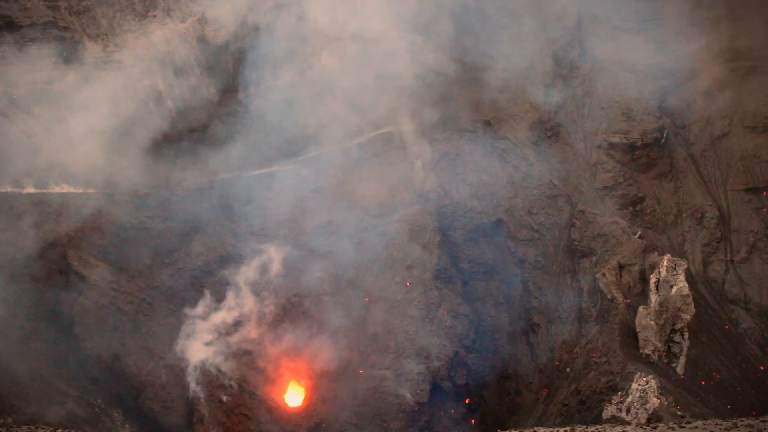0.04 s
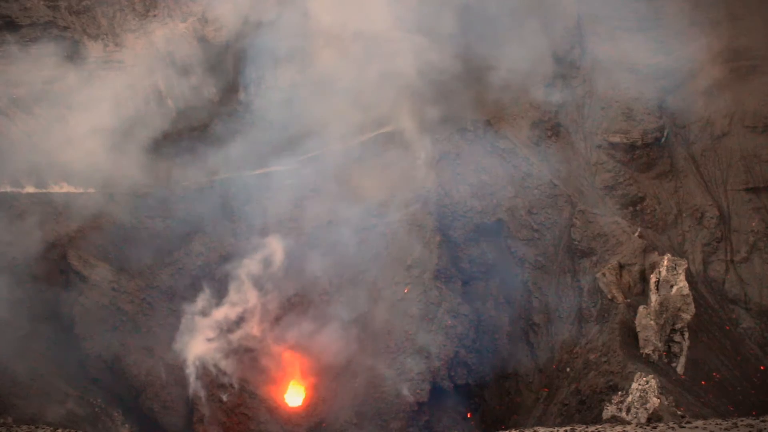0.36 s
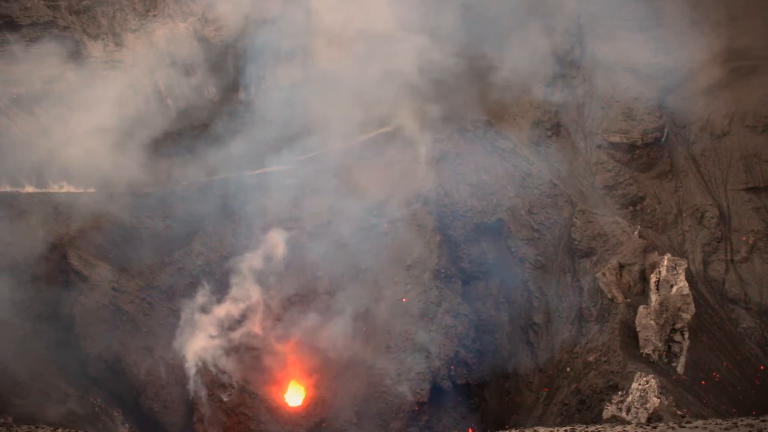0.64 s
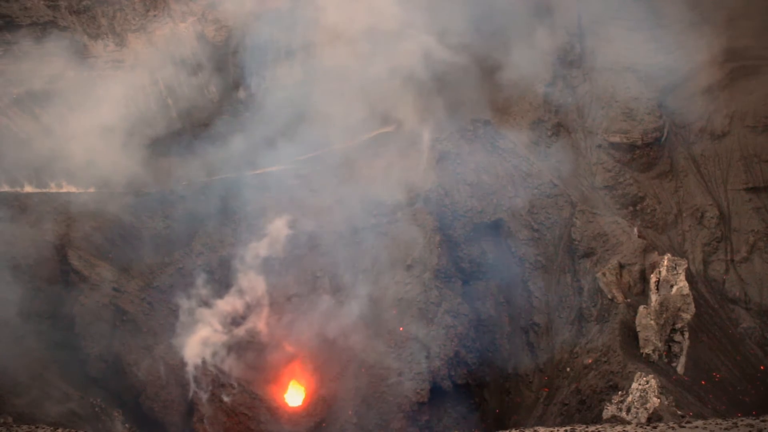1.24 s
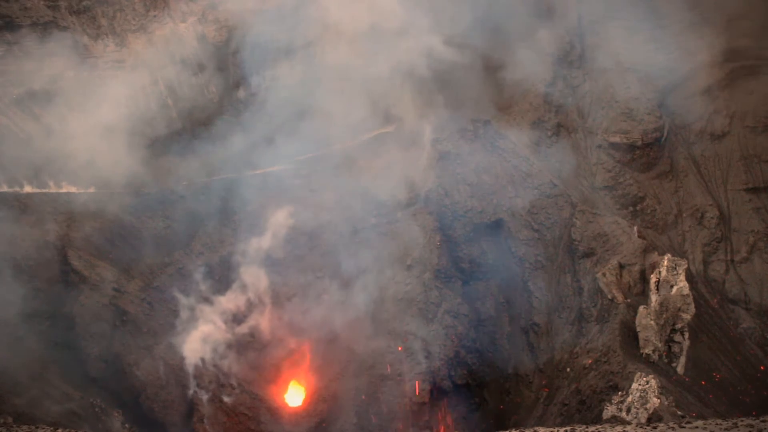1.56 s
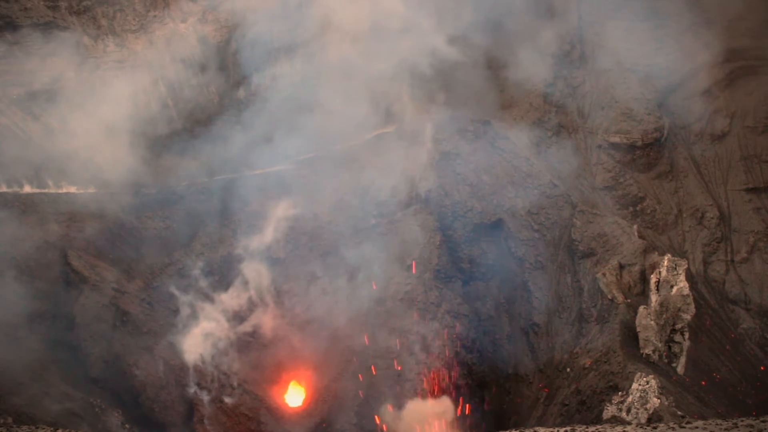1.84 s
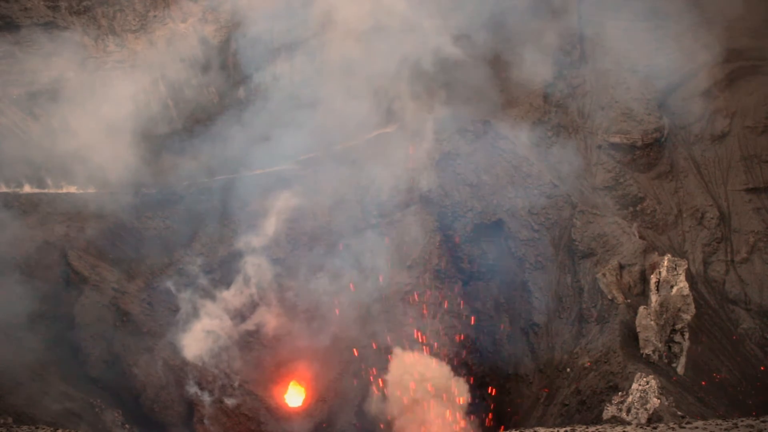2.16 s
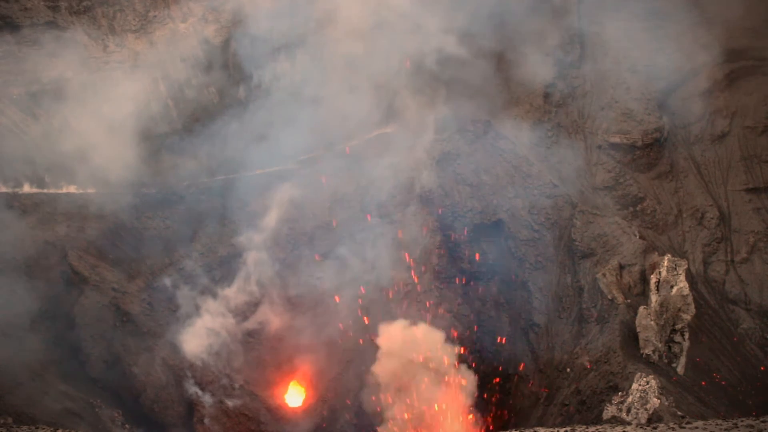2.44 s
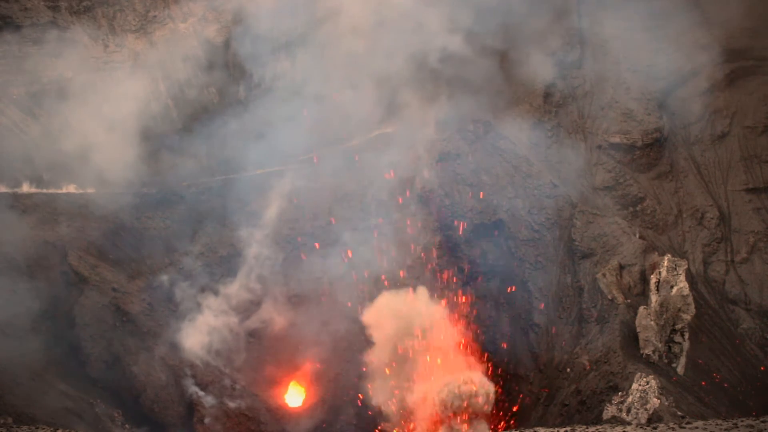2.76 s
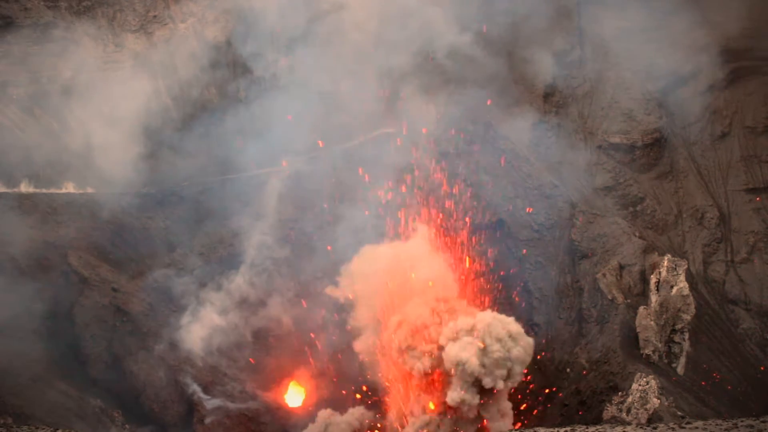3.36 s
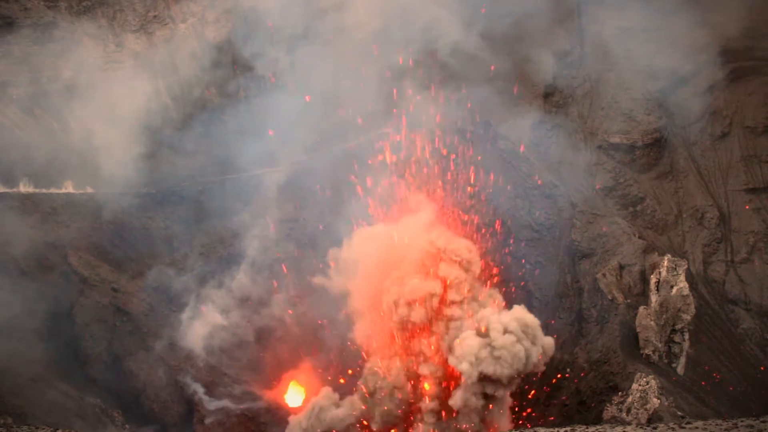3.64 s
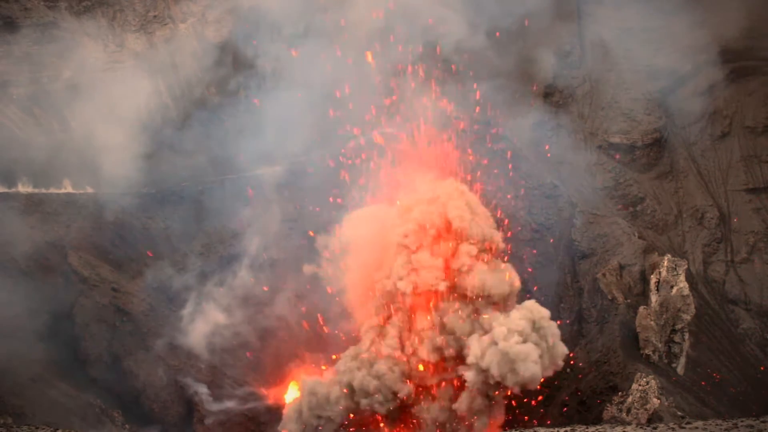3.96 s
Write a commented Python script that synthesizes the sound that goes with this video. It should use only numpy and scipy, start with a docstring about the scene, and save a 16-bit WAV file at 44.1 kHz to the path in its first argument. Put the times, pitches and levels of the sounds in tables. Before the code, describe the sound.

A volcano rumbles low, then erupts in a roaring blast of gas with dull booms.

```python
"""A gas jet roars out of a volcanic vent, heard from a microphone across the crater, on the rim.
At first a dull rumble ebbs. At two seconds the vent opens with a short hoot and the jet tears out,
rough with small shocks, then sinks into the churning of the conduit. A few heavy gas bursts echo off
the walls, and wind buffets the microphone. The sound cuts in a tenth of a second after the start."""
import sys
import numpy as np
from scipy import signal
from scipy.fft import rfft, irfft, next_fast_len
from scipy.io import wavfile
from scipy.ndimage import map_coordinates

SR = 44100
rng = np.random.default_rng(int(sys.argv[2]) if len(sys.argv) > 2 else 0)


def persist_wave(psi):
    """Save psi, clipped to +-1, as 16-bit WAV."""
    counts = np.round(np.clip(psi, -1, 1) * 32767).astype(np.int16)
    wavfile.write(sys.argv[1], SR, np.atleast_2d(counts).T)


N = 176400


def amp(db):
    """Decibels to gain."""
    return 10 ** (np.asarray(db) / 20)


def unit(x):
    """Scaled to rms 1."""
    return x / np.sqrt(np.mean(x ** 2) + 1e-20)


def clock():
    """The time of each sample in seconds."""
    return np.arange(N) / SR


def curve(rows):
    """(time_s, value) points joined by straight lines."""
    return np.interp(clock(), *np.transpose(rows))


def wobble(knots_per_s):
    """A smooth random curve."""
    return map_coordinates(rng.standard_normal(4096), [clock() * knots_per_s], mode="wrap")


def filtered(x, response):
    """x through a filter whose gain is response(hz)."""
    size = next_fast_len(N + SR // 2)
    return irfft(rfft(x, size) * response(np.fft.rfftfreq(size, 1 / SR)), size)[:N]


def coloured(x, points):
    """x shaped by (freq_hz, gain_db) points, at rms 1."""
    freq_hz, gain_db = np.transpose(points)
    return unit(filtered(x, lambda hz: amp(np.interp(np.log(hz + 1), np.log(freq_hz + 1), gain_db))))


def turbulence(pulses_per_s, spread_db, pulse_share):
    """Random pressure pulses of uneven size over a smooth rush."""
    sizes = amp(spread_db * np.minimum(rng.exponential(size=N), 4))
    pulses = (rng.random(N) < pulses_per_s / SR) * sizes
    rush = rng.standard_normal(N)
    return np.sqrt(pulse_share) * unit(pulses - pulses.mean()) + np.sqrt(1 - pulse_share) * rush


def faint_hiss():
    """A faint steady hiss under everything."""
    colour = [(1000, -13), (6000, 2.5), (9000, -3), (12000, -11.5), (14000, -19.5)]  # freq_hz, gain_db
    return amp(-96.5) * coloured(rng.standard_normal(N), colour)


# Deep bass right at the microphone: time_s, level_db
WIND_LEVEL = [(.12, -47.5), (.42, -46), (.7, -51), (.9, -47), (1.1, -49.5), (1.6, -51), (1.77, -45),
              (1.95, -52), (2.12, -32), (2.32, -30), (2.5, -33.5), (2.75, -36.5), (3.2, -39.5), (3.65, -36),
              (4, -34)]
# Its spectrum: freq_hz, gain_db
WIND_COLOUR = [(8, -40), (20, -18), (35, -0.5), (53, 1.5), (75, -0.5), (105, -3.5), (160, -21.5),
               (400, -55), (1500, -120)]

def wind():
    """Moving air rumbles in lumps on the microphone: wind on the rim and the blast's lowest swell."""
    level_db = curve(WIND_LEVEL) - 1.5 + 1.4 * wobble(7)
    return amp(level_db) * coloured(rng.standard_normal(N), WIND_COLOUR)


def gas_rumble(level_db, colour, surge):
    """Dense puffs of gas merge into a rumble that wavers slightly with the surge."""
    puffs = turbulence(pulses_per_s=320, spread_db=1.4, pulse_share=0.39)
    return amp(level_db + 0.2 * surge) * coloured(puffs, colour)


# The simmering crater below the microphone: time_s, level_db
SIMMER_LEVEL = [(.12, -34.5), (.3, -36.5), (.58, -37.5), (.78, -43), (1.2, -44), (1.62, -45.5), (1.75, -42),
                (1.9, -46.5), (4, -43)]
# Its spectrum: freq_hz, gain_db
SIMMER_COLOUR = [(40, -29), (90, -8.5), (135, 0), (175, -0.5), (250, -4), (320, -9.5), (370, -10.5),
                 (440, -9.5), (530, -16.5), (700, -16.5), (1000, -22), (2000, -31), (4000, -59),
                 (7000, -110)]

def simmer(surge):
    """Slow degassing keeps the crater rumbling, plainest before the blast."""
    return gas_rumble(curve(SIMMER_LEVEL) - 0.7, SIMMER_COLOUR, surge)


def wall_echo(x, t60_s=0.83):
    """The crater walls scatter a fading echo up to the rim."""
    tail = rng.standard_normal(SR) * amp(-60 * np.arange(SR) / SR / t60_s)
    return signal.fftconvolve(x, tail / np.linalg.norm(tail))[:N]


# Booms down in the crater: start_s, level_db, pitch_hz, decay_s
GAS_BURSTS = [(.135, -37.5, 158.5, 0.081), (1.724, -40.5, 57, 0.099), (2.301, -29.5, 55, 0.056),
              (2.575, -22, 167, 0.037), (2.658, -17.5, 226, 0.015), (3.489, -29, 226, 0.048),
              (3.551, -24, 215, 0.022), (3.725, -22, 57.4, 0.06), (3.765, -22, 167, 0.021)]

def gas_bursts(attack_s=0.0028, noise_share=0.72, width_octaves=0.4):
    """Large gas pockets burst, each a dull boom of a few rough cycles."""
    booms = np.zeros(N)
    for start_s, level_db, pitch_hz, decay_s in GAS_BURSTS:
        def band(hz):
            return np.exp(-0.5 * (np.log2((hz + 1) / pitch_hz) / width_octaves) ** 2)
        noise = unit(filtered(rng.standard_normal(N), band))
        tone = unit(np.sin(2 * np.pi * pitch_hz * (clock() - start_s)))
        ring = np.sqrt(1 - noise_share) * tone + np.sqrt(noise_share) * noise
        age = np.maximum(clock() - start_s, 0)
        envelope = (1 - np.exp(-age / attack_s)) * np.exp(-(age / decay_s) ** 2)
        booms += amp(level_db) * envelope * ring
    return booms


def vent_hoot(start_s=2.0, length_s=0.33, rise_s=0.088, fall_s=0.044):
    """The opening vent sounds one wavering pipe note."""
    age = clock() - start_s
    envelope = np.clip(age / rise_s, 0, 1) * np.clip((length_s - age) / fall_s + 0.5, 0, 1)
    pitch_hz = 167.3 + 3.7 * wobble(27)
    level_db = -31.5 + 2.4 * wobble(9.2)
    phase = 2 * np.pi * np.cumsum(pitch_hz) / SR
    return amp(level_db) * envelope * unit(np.sin(phase))


# The erupting conduit, heard from the rim: time_s, level_db
CHURN_LEVEL = [(1.8, -80), (1.95, -45.5), (2.08, -30), (2.35, -27), (2.64, -24.5), (2.76, -27.5),
               (3.06, -28), (3.25, -31), (3.42, -31.5), (3.52, -28), (3.68, -28.5), (3.86, -29.5),
               (4, -30.5)]
# Its spectrum: freq_hz, gain_db
CHURN_COLOUR = [(40, -31.5), (90, -10.5), (135, -2.5), (175, -0.5), (205, -1.5), (240, -1), (280, -3.5),
                (320, -1), (380, -8.5), (490, -9.5), (620, -15.5), (1000, -22), (2000, -29.5), (4000, -64),
                (7000, -110)]

def conduit_churn(surge):
    """Puffs of gas rumble in the broad resonances of the conduit."""
    return gas_rumble(curve(CHURN_LEVEL) + 0.29, CHURN_COLOUR, surge)


# The jet's roar and hiss from across the crater: time_s, level_db
ROAR_LEVEL = [(0.12, -53.5), (0.41, -55.5), (0.89, -63), (1.15, -55), (1.62, -60.5), (1.81, -51.5),
              (1.91, -51.5), (2.04, -38.5), (2.15, -32), (2.55, -30.5), (2.77, -30.5), (2.78, -32.5),
              (2.98, -36.5), (3.3, -42.5), (3.37, -38), (3.42, -41.5), (3.97, -37), (4.0, -34.5)]
HISS_LEVEL = [(0.12, -84), (0.9, -93.5), (1.1, -86), (1.65, -96), (1.73, -86), (1.92, -83), (2.08, -60),
              (2.28, -54.5), (2.37, -55.5), (2.72, -55.5), (2.83, -64.5), (2.96, -69.5), (3.29, -68.5),
              (3.34, -63), (3.44, -68.5), (4.0, -62)]
# Their spectra at that distance: freq_hz, gain_db
ROAR_COLOUR = [(120, -32.5), (300, -1.5), (500, 4), (680, 1), (850, 1), (1050, -2), (1320, 0.5), (1750, -3),
               (2200, -4), (2700, -7), (3450, -9), (4100, -21.5), (5000, -33.5), (7000, -54.5),
               (10000, -91)]
HISS_COLOUR = [(2500, -41), (4000, -1.5), (4700, -1.5), (6000, -6.5), (8000, -15), (10000, -26),
               (12000, -35), (14000, -51)]

def gas_jet(surge):
    """Gas tears out of the vent: the same small shocks roughen its roar and its hiss."""
    shocks = turbulence(pulses_per_s=1700, spread_db=2, pulse_share=0.4)
    flutter_db = 0.26 * surge + 0.03 * wobble(70)
    roar = amp(curve(ROAR_LEVEL) + 2.5 + flutter_db) * coloured(shocks, ROAR_COLOUR)
    hiss = amp(curve(HISS_LEVEL) + 1.5 + flutter_db) * coloured(shocks, HISS_COLOUR)
    return roar + hiss


def scene():
    """One microphone on the rim: jet and rumbles surge together, and only the booms echo."""
    surge = wobble(18)
    booms = gas_bursts()
    vent = gas_jet(surge) + conduit_churn(surge) + simmer(surge) + vent_hoot()
    echo = amp(-11) * wall_echo(booms)
    return (vent + booms + echo + wind() + faint_hiss())[None]


def record(dry):
    """The sound cuts in abruptly, and the highest treble falls away steeply."""
    start_s, rise_s, top_hz = 0.1031, 0.0032, 13500
    opened = dry * np.clip((clock() - start_s) / rise_s, 0, 1)
    return signal.sosfilt(signal.butter(14, top_hz, fs=SR, output="sos"), opened)


dry = scene()
out = record(dry)
persist_wave(out)
```